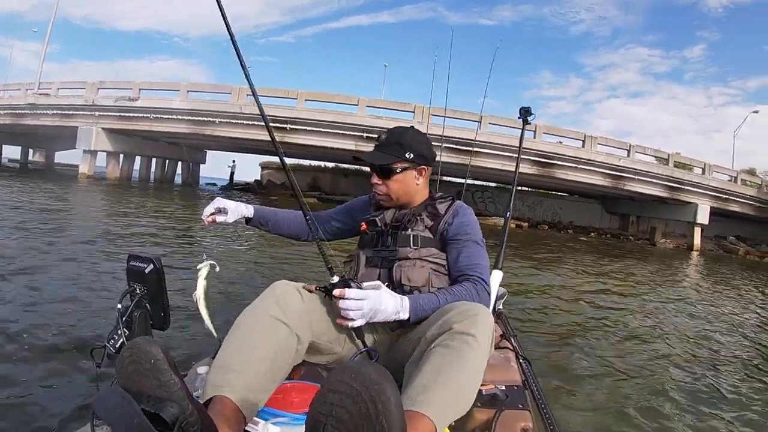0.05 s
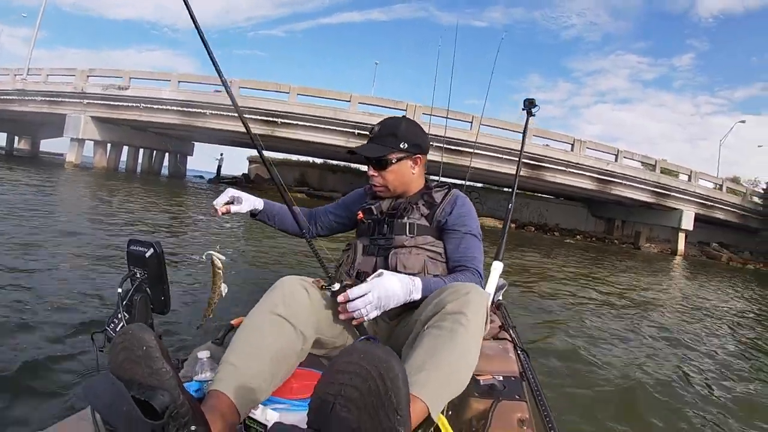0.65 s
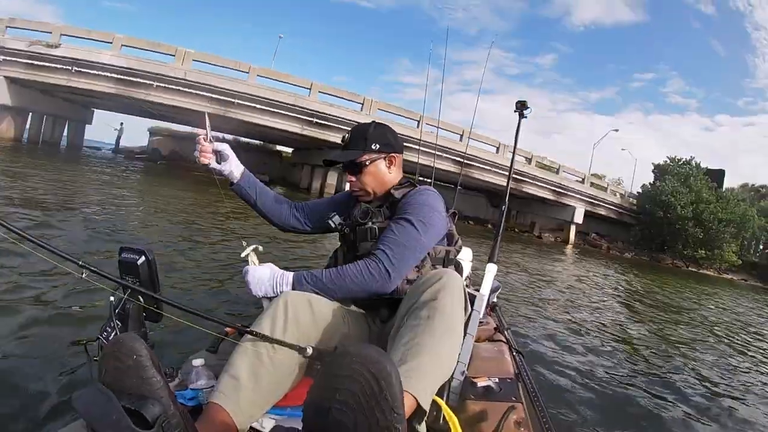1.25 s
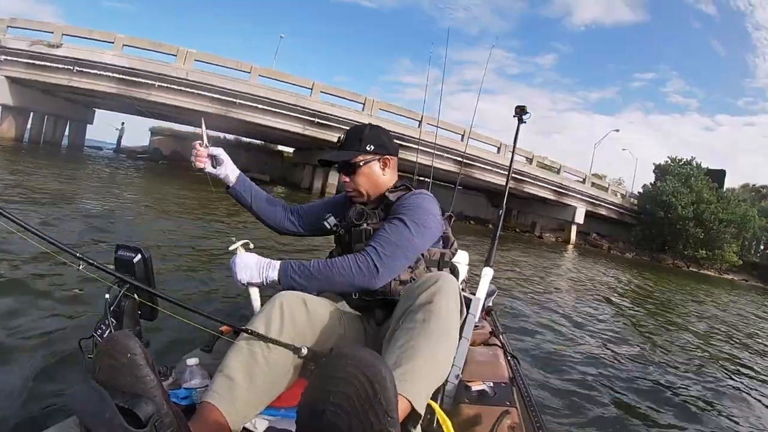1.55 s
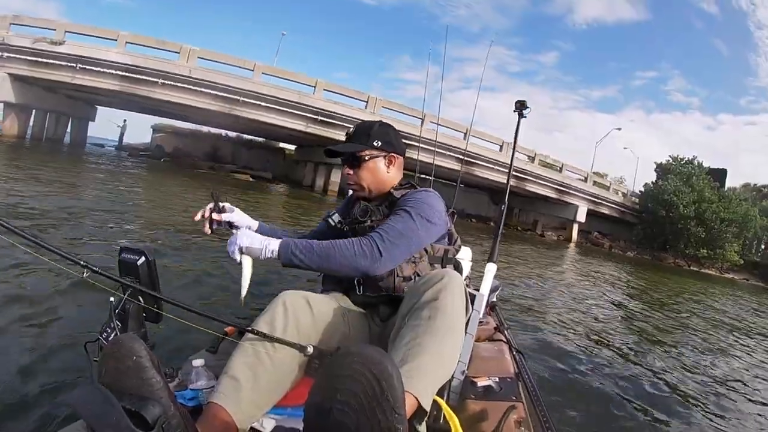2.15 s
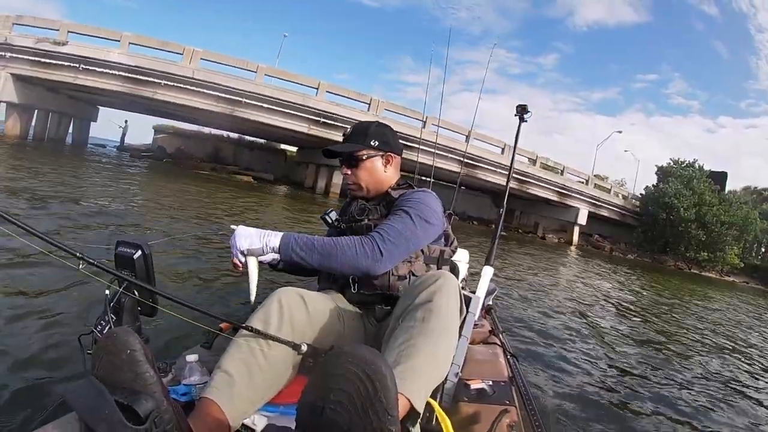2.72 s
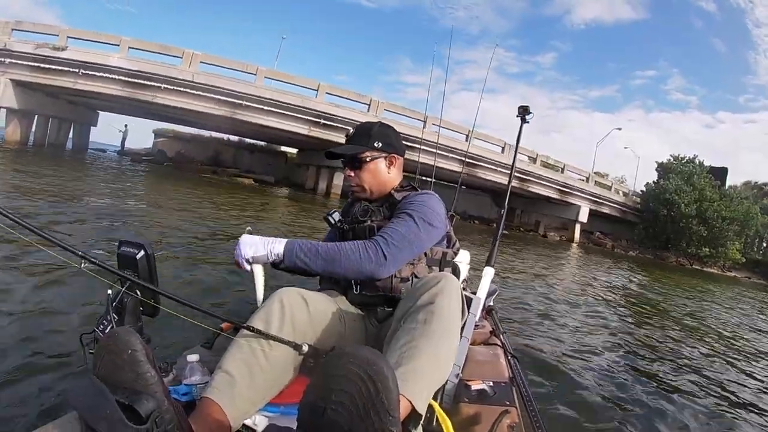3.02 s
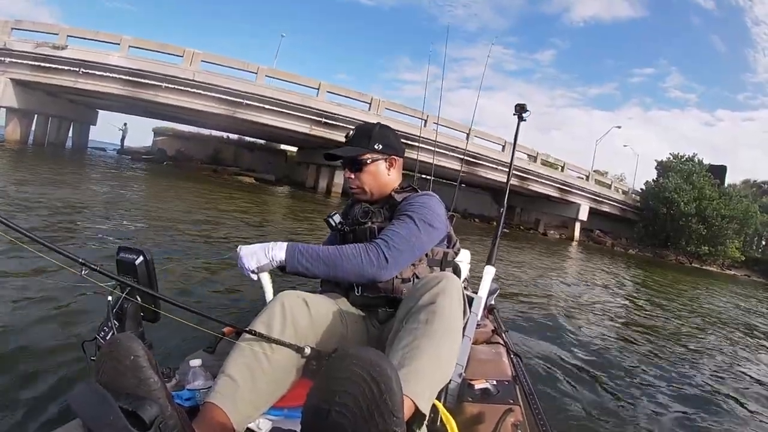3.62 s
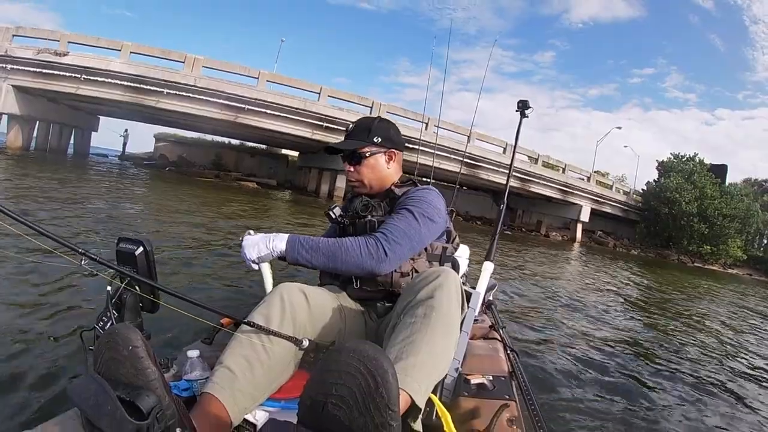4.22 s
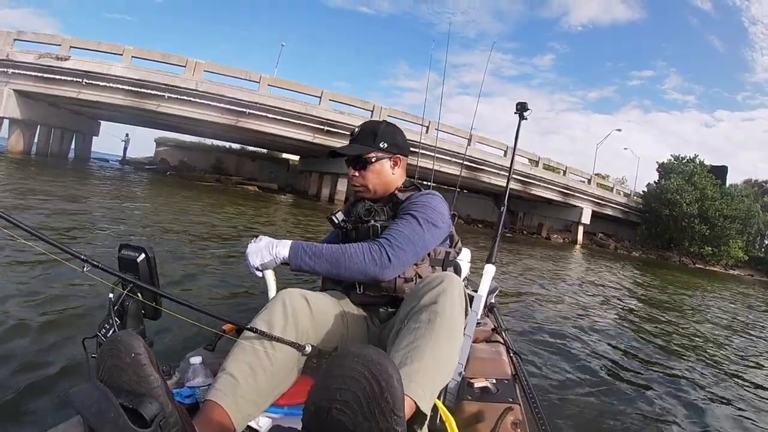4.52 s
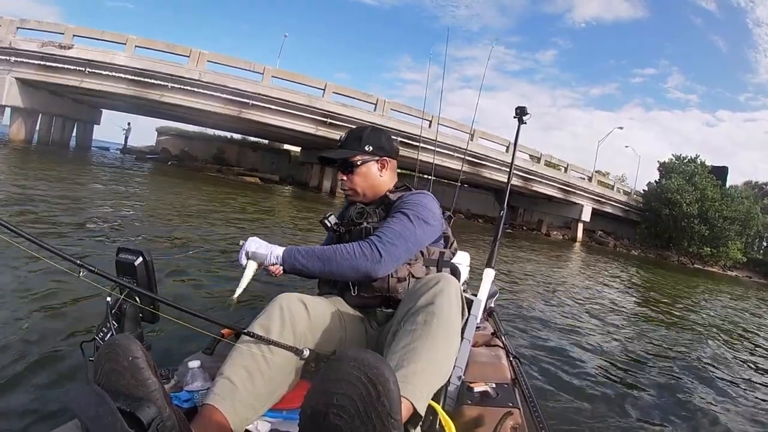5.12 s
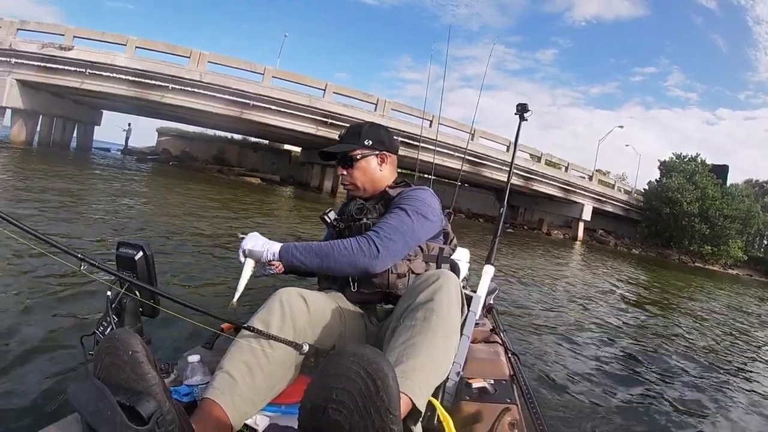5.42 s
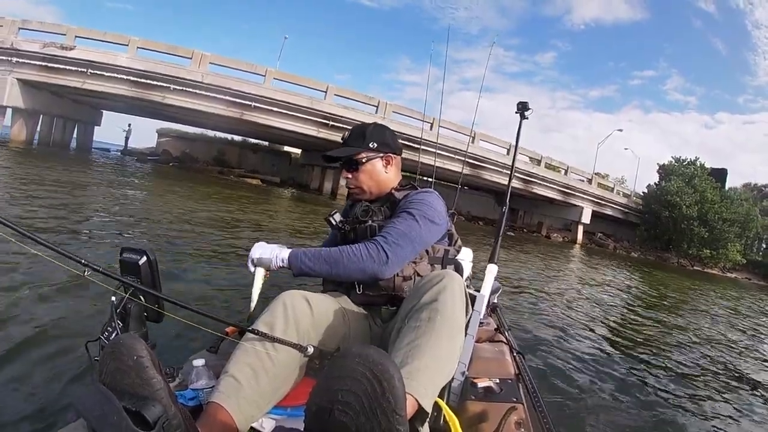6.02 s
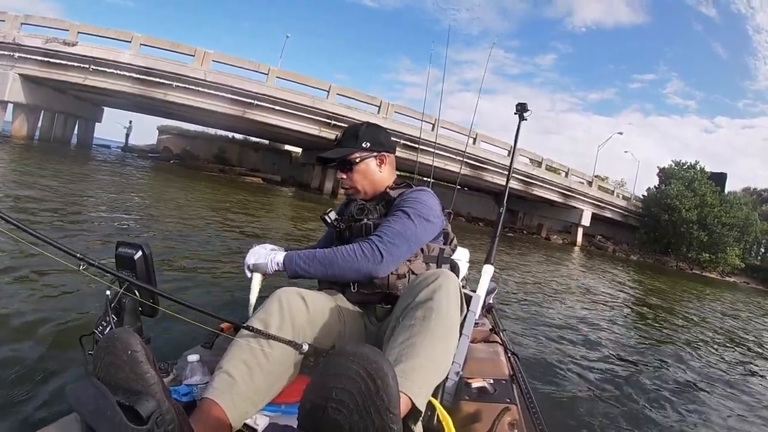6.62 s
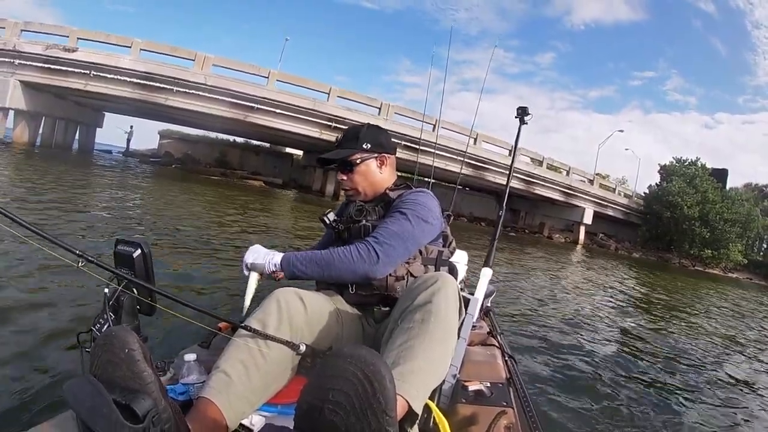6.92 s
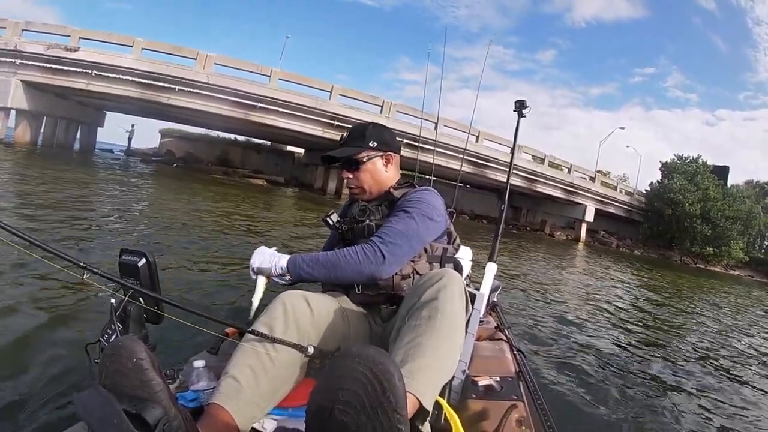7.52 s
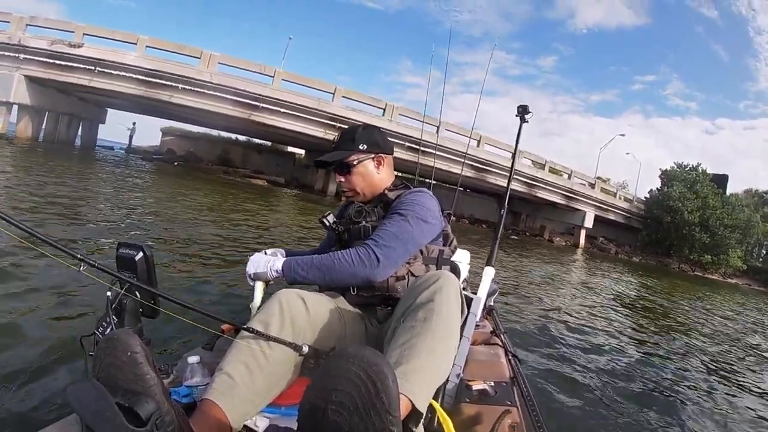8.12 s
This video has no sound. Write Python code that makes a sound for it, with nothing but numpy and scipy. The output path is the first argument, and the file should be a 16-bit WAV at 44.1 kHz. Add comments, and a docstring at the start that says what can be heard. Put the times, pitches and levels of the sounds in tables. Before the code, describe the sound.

Heard from a kayak beside a road bridge, low gusts buffet the microphone while fishing gear clicks and the hull gives a few dull knocks. A car passes briefly above, replaced abruptly by tyre roar, deep rumble and two humming engines, one steady and one rising and falling. Faint, high bird chirps come and go in the distance. The hum grows and a vehicle crosses a bridge joint with a double thump.

```python
"""From a kayak beside a concrete road bridge, with gusts on the microphone and tackle clicking close by.
A car's tyres swell overhead. At 0.9 s the scene cuts to a spot further along, where traffic rumbles
and a steady diesel and a second engine of changing speed hum and beat against each other.
From 1.3 s small birds chirp thinly far off. Two soft pulses accent the engines' beating at 7.5 and 7.8 s;
from 8.05 s two axles thump over a deck joint."""
import sys
import numpy as np
from scipy import signal
from scipy.fft import rfft, irfft, next_fast_len
from scipy.io import wavfile
from scipy.ndimage import uniform_filter1d

SR = 44100
rng = np.random.default_rng(int(sys.argv[2]) if len(sys.argv) > 2 else 0)


def dump_mix(stems):
    """Bounce the given channels to the path in sys.argv[1] as a 16-bit WAV at rate SR."""
    frames = np.atleast_2d(stems).T  # one column per channel
    limited = np.clip(frames, -1, 1)  # hard clip at full scale
    pcm = np.round(limited * 32767).astype(np.int16)
    wavfile.write(sys.argv[1], SR, pcm)


N = 368676

# far bird notes: start_s, length_s, start_hz, end_hz, level_db, trill_depth_hz, trill_rate_hz
BIRD_NOTES = [(1.28, 0.24, 8200, 7500, -77, 250, 110), (2.06, 0.35, 7950, 7450, -70, 70, 110),
              (3.061, 0.12, 7800, 7300, -68, 150, 129), (3.178, 0.07, 6460, 6000, -59.5, 480, 92.5),
              (3.228, 0.088, 6000, 6650, -63, 350, 104), (3.302, 0.25, 6900, 7100, -68.5, 120, 109),
              (3.505, 0.036, 6940, 6000, -60, 70, 110), (3.534, .035, 5600, 4960, -57, 320, 160),
              (3.71, 0.16, 7150, 7150, -73, 417, 70), (3.922, 0.22, 6730, 6030, -71, 199, 110),
              (4.384, .2, 8250, 7550, -73, 130, 110), (4.58, .28, 7250, 6600, -71, 140, 110),
              (5.113, 0.1, 7750, 6700, -72, 150, 131), (5.162, 0.27, 6600, 6850, -64.5, 150, 159),
              (5.925, .25, 7000, 7500, -71, 280, 120.6), (6.601, 0.096, 6824, 6616, -77, 150, 110)]
# faint tones of other vehicles: loudest_s, width_s, pitch_hz, level_db
FAR_TONES = [(1.4, 1.3, 462, -44.5), (1.9, 1.4, 322.4, -50.5), (2.197, 1.5, 355.4, -44.5),
             (4.6, 0.56, 330.4, -41.5), (5.42, 0.43, 344, -41.5), (5.9, 0.55, 336, -39.5)]
# rod and line squeaking: start_s, length_s, pitch_hz, level_db
LINE_SQUEAKS = [(0.028, 0.072, 4260, -52), (2.606, 0.016, 2620, -43), (2.666, 0.07, 2697, -49)]
# gloves and tackle rustling: loudest_s, width_s, level_db
GLOVE_RUSTLES = [(.07, 0.22, -49), (1.956, 0.018, -46), (8.059, 0.088, -60), (8.23, 0.16, -58)]
# hard tackle parts meeting: start_s, peak_db, centre_hz, t60_s
TACKLE_CLICKS = [(.365, -57, 10000, .006), (1.389, -27, 1450, 0.038), (1.9415, -20, 1750, 0.02),
                 (1.9425, -31, 3150, .05), (1.9465, -29, 1200, 0.035), (1.989, -33, 1900, .025),
                 (2.016, -40, 3200, .015), (2.027, -37, 3100, .018), (2.028, -55, 10000, .006),
                 (2.6127, -38.5, 4400, .016), (3.044, -42, 4600, .02), (4.679, -37, 2227, .028),
                 (4.815, -35, 2483, .025), (5.193, -37, 3700, .012), (5.2075, -31, 3600, 0.01),
                 (5.2773, -30, 3600, 0.01), (6.1, -54, 10000, 0.0055), (6.66, -57.5, 10030, .006),
                 (7.118, -48, 5400, .01), (7.286, -40, 4854, 0.0085), (7.2865, -56, 10090, 0.0058),
                 (7.297, -54, 10000, .005), (8.051, -33, 3400, .016), (8.051, -30, 1090, .018),
                 (8.2, -39, 3500, .04)]
# dull bumps on the hull: start_s, gain_db, pitch_hz, t60_s
HULL_BUMPS = [(0.071, -7, 77.4, 0.073), (0.077, 3.5, 173, 0.022), (0.308, -11, 38, 0.1),
              (0.353, -5, 92, 0.042), (1.387, -1, 116, 0.043), (1.71, 3, 87, 0.036),
              (1.945, -3, 207, 0.055), (1.947, -7, 66, 0.054), (2.036, -12, 319, 0.067),
              (4.696, -6, 65, 0.054), (4.825, -5.5, 50, 0.11)]
# gusts at the microphone: loudest_s, width_s, level_db
MIC_GUSTS = [(.06, 0.16, -25.5), (.34, 0.16, -25), (0.799, 0.45, -27.5), (1.55, 0.39, -29.5),
             (2.549, 0.91, -33.5), (3.75, 0.53, -28.5), (4.18, 0.11, -22), (4.721, 0.5, -26),
             (5.28, 0.41, -26), (6.62, 0.78, -29.5), (7.7, .3, -31), (8.26, 0.14, -28.5)]
# heavy vehicles and gaps in the traffic: centre_s, width_s, rumble_change_db
DECK_LOADS = [(1.4, 0.38, 4), (2.03, 0.3, 3.5), (3, 0.4, 2.5), (5.02, 0.11, -9.5), (5.53, 0.33, -13),
              (7.72, 0.3, 1), (8.22, 0.22, 2)]
# two soft pulses in the engines' beating, then two axles on the deck joint: start_s, level_db
PULSES_AND_THUMPS = [(7.523, -26), (7.771, -21), (8.0513, -14.5), (8.1969, -12.5)]
# resonances shared by all four: pitch_hz, gain_db, t60_s
RING_MODES = [(199, 2.5, 0.053), (390, 1, 0.044), (488, 5, 0.038), (590, 1.5, 0.037), (742, -3, 0.031),
              (1060, -11, .02)]
# steady diesel: time_s, cycle_rate_hz, level_db
DIESEL_RUN = [(.9, 29.95, -43), (2, 29.9, -41), (2.7, 29.95, -36), (4.3, 30.36, -37.5), (5.2, 29.98, -41.5),
              (6, 30.13, -33.5), (7.3, 30.11, -32), (8.36, 29.88, -28.5)]
# its orders: multiple, gain_db
DIESEL_PARTIALS = [(2, -5.5), (3, -10), (5, 3), (6, 1.4), (7, -4), (8, -12.5), (11, -12)]
# engine of changing speed: time_s, firing_rate_hz, gain_db
ENGINE_RUN = [(.9, 137.5, -23.5), (1.35, 134, -27.5), (1.8, 131.9, -33.5), (2.4, 132.3, -33),
              (2.8, 135.5, -30), (3.2, 140, -22), (3.67, 147.7, -22.5), (4.03, 146, -23.5),
              (4.25, 147.2, -28.5), (4.62, 145.8, -29.5), (5.1, 150.3, -29.5), (5.6, 149.4, -24.5),
              (5.79, 148.6, -18.5), (6.25, 148.3, -21), (6.6, 144.3, -21), (7.3, 142.7, -21),
              (7.65, 140.9, -21.5), (8.36, 139.7, -25)]
# its harmonics: multiple, gain_db, rasp_db, flicker_db
ENGINE_HARMONICS = [(1, -0.5, -59.5, .5), (2, -16.5, -47.5, 1.7), (3, -29, -41.5, 2.6)]
# how much of it arrives by scattered paths under the bridge: time_s, power_share
ENGINE_SCATTER = [(1.5, 0.3), (3, 0.016)]

# spectra of the noise sources: frequency_hz, gain_db
GLOVE_SPECTRUM = [(1500, -1.5), (2200, 2), (3600, -3), (4800, -12.5), (7000, -27), (11000, -45)]
WIND_SPECTRUM = [(10, -15), (25, -6), (45, 2), (80, -3.5), (130, -7), (220, -18.5), (400, -34),
                 (900, -59.5)]
DECK_SPECTRUM = [(70, -7.5), (120, -2.5), (170, 4.5), (240, 0.5), (330, -7.5), (420, -12), (700, -24)]
TYRE_ROAR_SPECTRUM = [(200, -7.5), (380, 1), (550, 2), (780, -1.2), (1000, -6), (1500, -9), (1950, -14),
                      (2600, -23.5), (4000, -33.5)]
TYRE_HISS_SPECTRUM = [(1500, -8.5), (2700, 0.5), (3800, -3.5), (4700, -7.5), (5650, -8), (6150, -18.5),
                      (6900, -25), (8000, -35), (10500, -31), (13500, -39)]
TRUCK_SPECTRUM = [(450, -7.5), (600, 2.5), (850, -2), (1200, -22), (2200, -19), (3300, -18), (4500, -33.5)]
CAR_ROAR_SPECTRUM = [(250, -5.5), (370, -6.5), (435, 2), (490, -6.5), (700, -4), (930, -7.5), (1250, -4),
                     (1620, -4.5), (2100, -16.5), (2550, -15), (3400, -39.5), (5000, -41.5)]
CAR_HISS_SPECTRUM = [(1500, 6), (3000, 3), (4200, -4.5), (5000, -8.5), (5700, -10), (6300, -20.5),
                     (7200, -30), (8200, -34), (13000, -42)]

TIME = np.arange(N) / SR


def undb(db):
    """Decibels to gain."""
    return 10 ** (np.asarray(db) / 20)


def curves(table):
    """Each column after time_s, joined by straight lines over the whole duration."""
    s, *columns = np.transpose(table)
    return [np.interp(TIME, s, c) for c in columns]


def walk(rate):
    """Random levels held 1 / rate s and smoothed twice; spread near 1."""
    hold = max(int(SR / rate), 2)
    steps = np.repeat(rng.standard_normal(N // hold + 1), hold)
    return 1.46 * uniform_filter1d(uniform_filter1d(steps, hold), hold)[:N]


def noise(spectrum):
    """Noise of rms 1 with a spectrum that falls away beyond its ends."""
    hz, db = np.transpose(spectrum)
    size = next_fast_len(N)
    f = np.maximum(np.fft.rfftfreq(size, 1 / SR), 1)
    skirts = np.minimum(f / hz[0], 1) ** 2 * np.minimum(hz[-1] / f, 1) ** 4
    gain = undb(np.interp(np.log(f), np.log(hz), db)) * skirts
    shaped = irfft(rfft(rng.standard_normal(size)) * gain, size)[:N]
    return shaped / np.sqrt(np.mean(shaped ** 2))


def fade(t, t60):
    """Free decay, 60 dB in t60 seconds."""
    return np.exp(-np.log(1000) * t / t60)


def hump(s, width):
    """A smooth swell that reaches 1 at time s and is above half for width seconds."""
    return .5 ** ((2 * (TIME - s) / width) ** 2)


def add(out, s, sound):
    """Mix a sound in at time s."""
    i = max(int(s * SR), 0)
    out[i:i + len(sound)] += sound[:max(N - i, 0)]


def scattered(phase, blur_hz=30):
    """A tone reaches the microphone by many shifting paths, so its level and phase wander."""
    return walk(blur_hz) * np.sin(phase) + walk(blur_hz) * np.cos(phase)


def birds(wander_hz=60, rough_hz=115, scatter_db=2.5, echo_db=-15, echo_t60=.25):
    """Far off, thin gliding whistles with a fast, uneven trill, blurred by echoes from the bridge."""
    out = np.zeros(N)
    for s, length, start_hz, end_hz, db, depth_hz, trill_hz in BIRD_NOTES:
        n = int(length * SR)
        progress = np.linspace(0, 1, n)
        trill = 2 * np.pi * np.cumsum(trill_hz * (1 + .17 * walk(120)[:n])) / SR
        glide = start_hz + (end_hz - start_hz) * progress + wander_hz * walk(30)[:n]
        hz = glide + depth_hz * np.sin(trill) + rough_hz * walk(900)[:n]
        # a deep trill sounds mostly on its upstrokes
        pulse = 1 + min(depth_hz / 300, 1) * np.cos(trill)
        swell = np.sqrt(np.abs(np.sin(np.pi * progress)))
        level = undb(db + scatter_db * walk(120)[:n])
        add(out, s, swell * pulse * level * np.sin(2 * np.pi * np.cumsum(hz) / SR))
    t = np.arange(SR // 3) / SR
    echo = rng.standard_normal(len(t)) * fade(t, echo_t60)
    return out + undb(echo_db) * signal.fftconvolve(out, echo / np.linalg.norm(echo))[:N]


def far_vehicles(sag_hz_per_s=1.5):
    """Faint, blurred tones from other vehicles come and go, sagging as they pass."""
    out = np.zeros(N)
    for s, width, middle_hz, db in FAR_TONES:
        hz = middle_hz - sag_hz_per_s * (TIME - s)
        out += undb(db) * hump(s, width) * scattered(2 * np.pi * np.cumsum(hz) / SR)
    return out


def squeaks():
    """Rubbed rod and line squeak briefly at a wavering pitch."""
    out = np.zeros(N)
    for s, length, hz, db in LINE_SQUEAKS:
        swell = np.sin(np.linspace(0, np.pi, int(length * SR)))
        phase = 2 * np.pi * np.cumsum(hz * (1 + .026 * walk(500)[:len(swell)])) / SR
        add(out, s, np.sqrt(2) * undb(db) * swell * np.sin(phase))
    return out


def click(hz, t60, spread=1.25, strike=9, body_db=-8):
    """Small hard parts strike and scrape: one broad resonance over a duller, weaker body; peak 1."""
    t = np.arange(SR // 8) / SR
    band = signal.butter(4, [hz / spread, hz * spread], "bandpass", fs=SR, output="sos")
    body = signal.butter(3, [hz / spread ** 4, hz * spread], "bandpass", fs=SR, output="sos")
    scrape, knock = rng.standard_normal((2, len(t))) * fade(t, t60)
    burst = signal.sosfilt(band, scrape + strike * (t == 0))
    burst += undb(body_db) * signal.sosfilt(body, knock)
    return burst / np.abs(burst).max()


def tackle(ticks_per_s=8, tick_db=-63, tick_range_db=10):
    """Lure and line handled near the microphone: gloves rustle, parts click, the line ticks faintly."""
    handling = sum(undb(db) * hump(s, width) for s, width, db in GLOVE_RUSTLES)
    out = handling * undb(2 * walk(150)) * noise(GLOVE_SPECTRUM)
    for s, db, hz, t60 in TACKLE_CLICKS:
        add(out, s, undb(db) * click(hz, t60))
    for when, softness in rng.random((int(ticks_per_s * N / SR), 2)):
        add(out, when * N / SR, undb(tick_db - tick_range_db * softness) * click(hz=10000, t60=.008))
    return out


def hull(attack_s=.008):
    """Soft bumps thud through the plastic kayak."""
    out, t = np.zeros(N), np.arange(SR // 4) / SR
    attack = 1 - np.exp(-t / attack_s)
    for s, db, hz, t60 in HULL_BUMPS:
        add(out, s, undb(db) * attack * fade(t, t60) * np.sin(2 * np.pi * hz * t))
    return out


def wind(breeze_db=-33.5, flicker_db=1.2):
    """Eddies right at the microphone: a low, uneven rumble that swells with each gust."""
    power = undb(breeze_db) ** 2 + sum(undb(db) ** 2 * hump(s, width) for s, width, db in MIC_GUSTS)
    return np.sqrt(power) * undb(flicker_db * walk(14)) * noise(WIND_SPECTRUM)


def traffic(deck_db=-30.5, roar_db=-37, hiss_db=-53, hiss_fade_db_per_s=.35):
    """Up on the bridge, wheels shake the deck and roar on it; a far car and a truck swell through."""
    load_db = sum(db * hump(s, width) for s, width, db in DECK_LOADS)
    deck = undb(deck_db + load_db + 1.1 * walk(12)) * noise(DECK_SPECTRUM)
    roar = undb(roar_db + .12 * load_db + .34 * walk(14)) * noise(TYRE_ROAR_SPECTRUM)
    hiss = undb(hiss_db - hiss_fade_db_per_s * TIME + .61 * walk(22)) * noise(TYRE_HISS_SPECTRUM)
    far_car = undb(-45) * hump(s=5.6, width=1.2) * noise(CAR_ROAR_SPECTRUM)
    truck = undb(-39.5) * hump(s=8.32, width=1) * noise(TRUCK_SPECTRUM)
    return deck + roar + hiss + far_car + truck


def passing_car(nearest_s=.77, speed_m_s=33.4, distance_m=10.1, roar_db=-31.5, hiss_db=-43.5):
    """Overhead, tyres on concrete swell as a car nears, the roar more than the hiss; the tread flutters."""
    along_m = speed_m_s * (TIME - nearest_s)
    near_db = 20 * np.log10(distance_m / np.hypot(along_m, distance_m))
    flutter_db = .4 * walk(31)
    roar = undb(roar_db + near_db) * noise(CAR_ROAR_SPECTRUM)
    hiss = undb(hiss_db + .28 * near_db) * noise(CAR_HISS_SPECTRUM)
    return undb(flutter_db) * (roar + hiss)


def pulses_and_joint(echo_db=-16, echo_t60=.12, attack_s=.0056):
    """Two pulses accent the engines' beating, then two axles thump a deck joint; all echo overhead."""
    out, t = np.zeros(N), np.arange(SR // 3) / SR
    # a gradual onset, so there is no click
    attack = 1 - np.exp(-(t / attack_s) ** 2)
    for s, db in PULSES_AND_THUMPS:
        detunes = 1 + .016 * rng.standard_normal(len(RING_MODES))
        ring = attack * sum(undb(mode_db) * fade(t, t60) * np.sin(2 * np.pi * hz * detune * t)
                            for (hz, mode_db, t60), detune in zip(RING_MODES, detunes))
        echo = attack * undb(echo_db) * fade(t, echo_t60) * noise(TYRE_ROAR_SPECTRUM)[:len(t)]
        add(out, s, undb(db) * (ring / np.abs(ring).max() + echo))
    return out


def diesel(flicker_db=1.6):
    """A heavy engine at near-constant speed; its fifth order beats against the other exhaust note."""
    hz, db = curves(DIESEL_RUN)
    phase = 2 * np.pi * np.cumsum(hz * (1 + .00085 * walk(12))) / SR
    hum = sum(undb(order_db + flicker_db * walk(4)) * np.sin(k * phase + rng.uniform(0, 2 * np.pi))
              for k, order_db in DIESEL_PARTIALS)
    return np.sqrt(2) * undb(db) * hum


def throttled_engine(trim_db=-1.5):
    """An exhaust note follows the throttle and rasps once under load; distance leaves three harmonics."""
    hz, db = curves(ENGINE_RUN)
    rasp, = curves([(3.42, 0), (3.6, 1), (4.74, 1), (5.49, 0)])  # time_s, amount
    share, = curves(ENGINE_SCATTER)
    phase = 2 * np.pi * np.cumsum(hz * (1 + .0028 * walk(20))) / SR
    level = undb(trim_db + db)
    direct = np.zeros(N)
    for k, harmonic_db, rasp_db, flicker_db in ENGINE_HARMONICS:
        strength = level * undb(harmonic_db) + rasp ** 2 * undb(rasp_db)
        direct += strength * undb(flicker_db * walk(28)) * np.sin(k * phase)
    return np.sqrt(2 * (1 - share)) * direct + np.sqrt(share) * level * scattered(phase)


def scene(cut_s=.893, crossfade_s=.00016):
    """Two spots by the bridge, joined by a cut; wind, birds and the kayak's sounds run through both."""
    after = np.clip((TIME - cut_s) / crossfade_s + .5, 0, 1)
    first_spot = passing_car()
    second_spot = traffic() + throttled_engine() + diesel() + far_vehicles() + pulses_and_joint()
    road = (1 - after) * first_spot + after * second_spot
    return (road + wind() + hull() + squeaks() + birds() + tackle())[None]


def record(dry, top_hz=14000, fade_s=.004):
    """One microphone on the kayak: soft at both ends, with the top of the treble cut."""
    ends = np.minimum(np.minimum(TIME, TIME[::-1]) / fade_s, 1)
    lowpass = signal.ellip(8, .2, 70, top_hz, fs=SR, output="sos")
    return signal.sosfilt(lowpass, dry * ends)


dry = scene()
out = record(dry)
dump_mix(out)
```